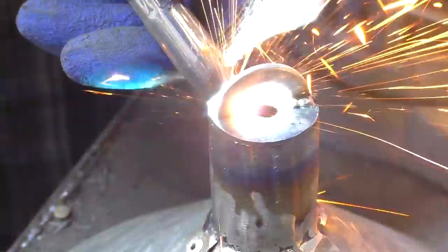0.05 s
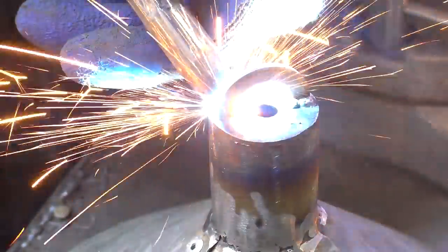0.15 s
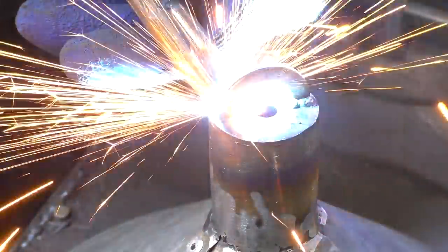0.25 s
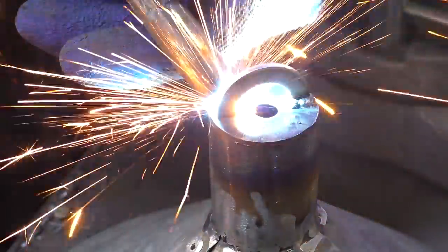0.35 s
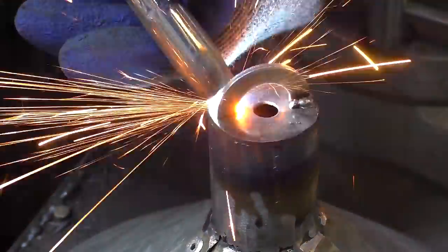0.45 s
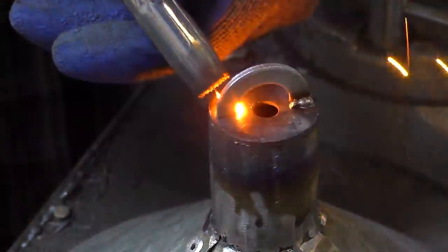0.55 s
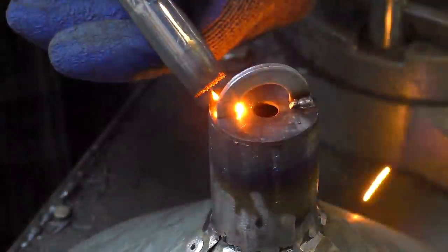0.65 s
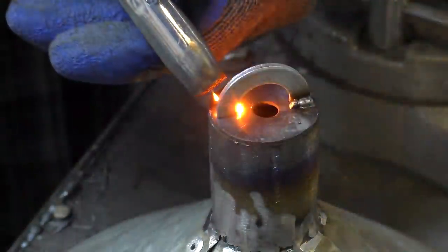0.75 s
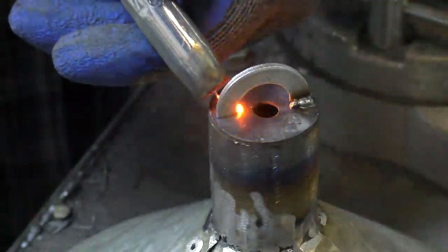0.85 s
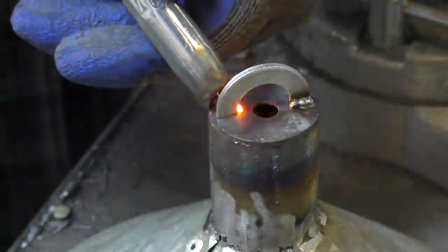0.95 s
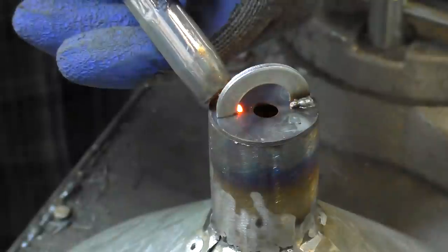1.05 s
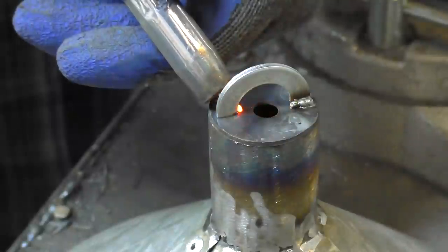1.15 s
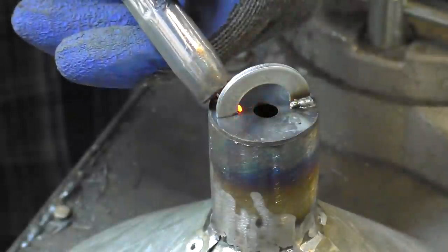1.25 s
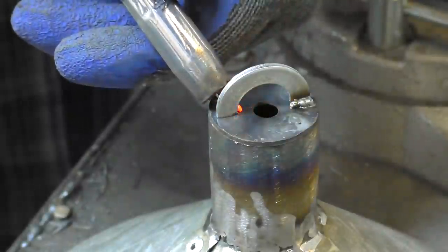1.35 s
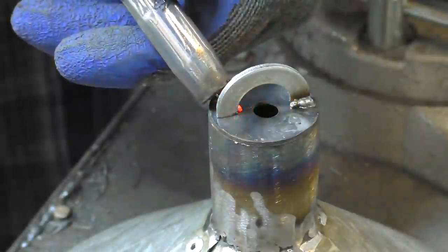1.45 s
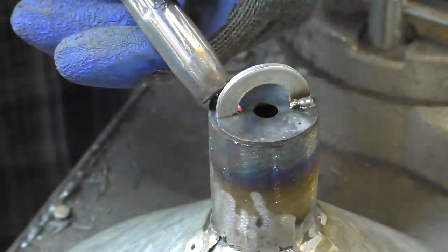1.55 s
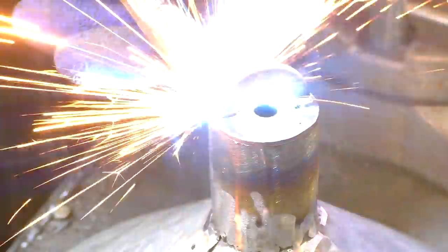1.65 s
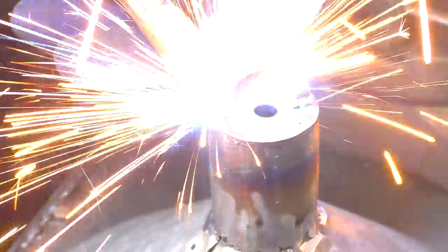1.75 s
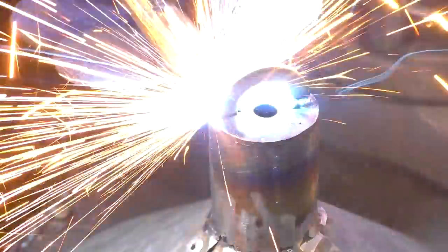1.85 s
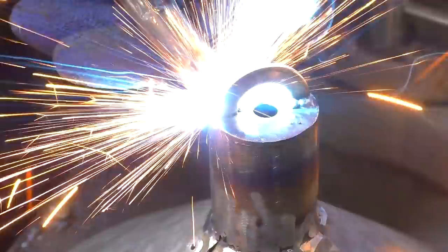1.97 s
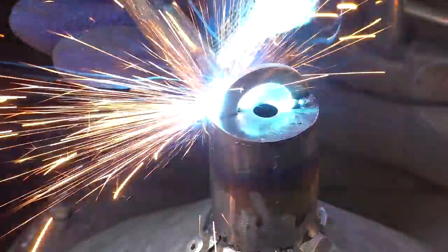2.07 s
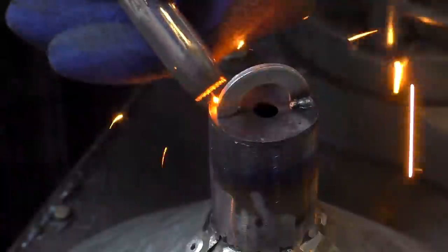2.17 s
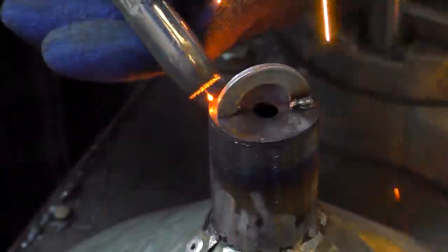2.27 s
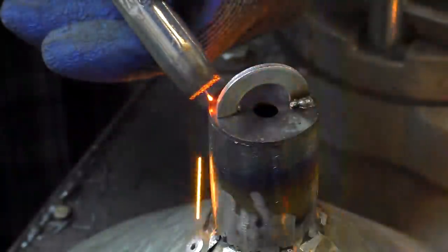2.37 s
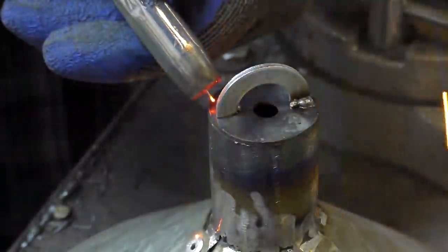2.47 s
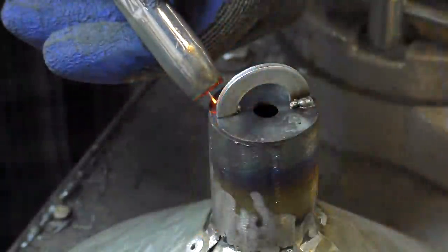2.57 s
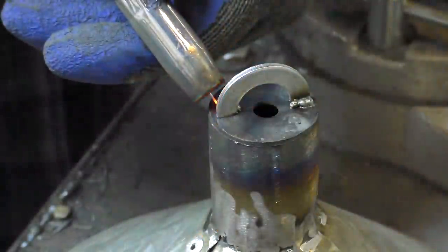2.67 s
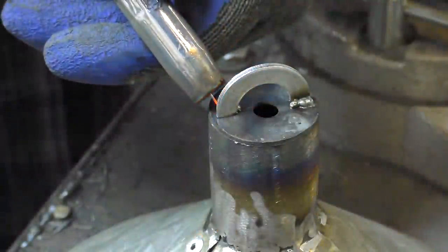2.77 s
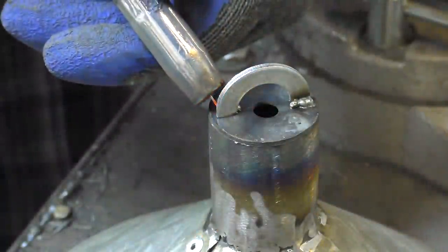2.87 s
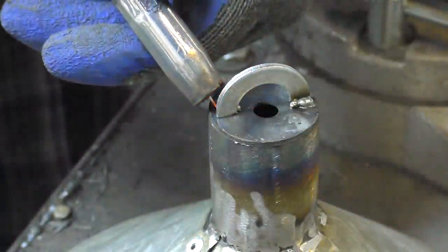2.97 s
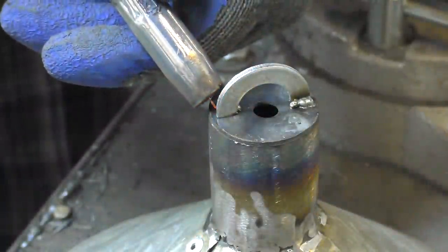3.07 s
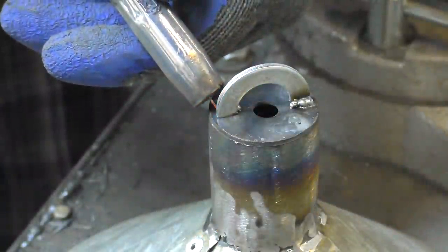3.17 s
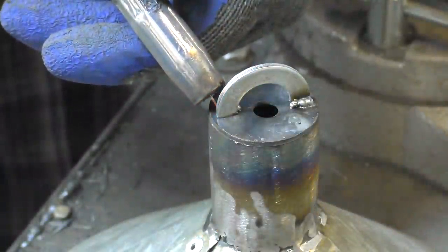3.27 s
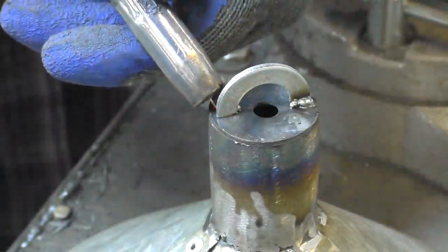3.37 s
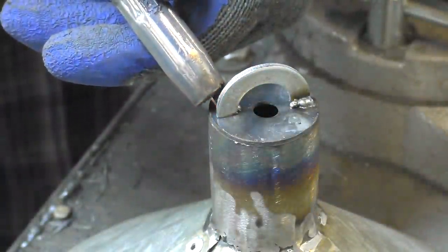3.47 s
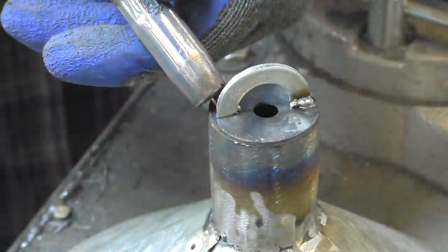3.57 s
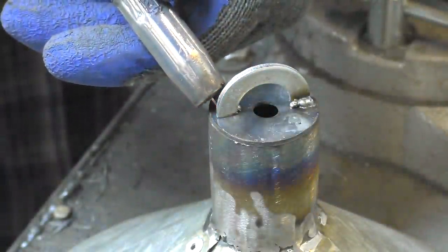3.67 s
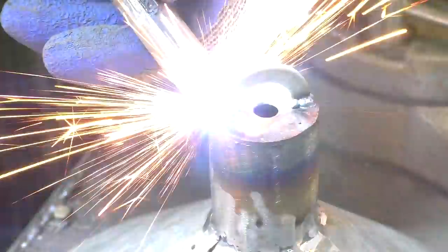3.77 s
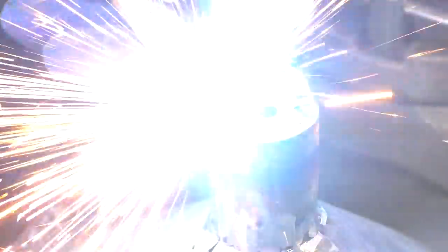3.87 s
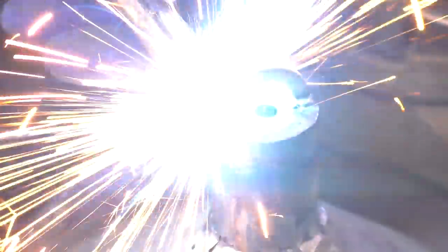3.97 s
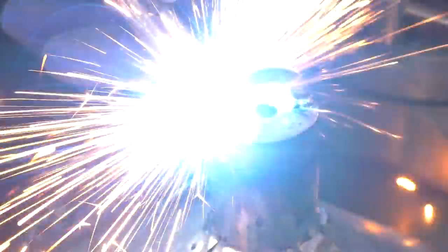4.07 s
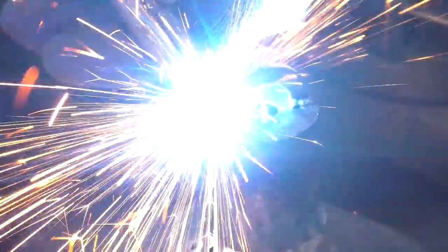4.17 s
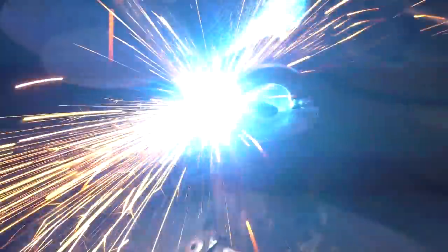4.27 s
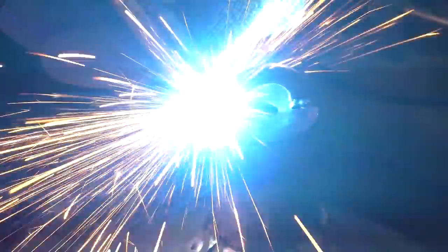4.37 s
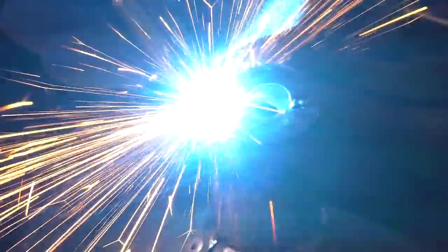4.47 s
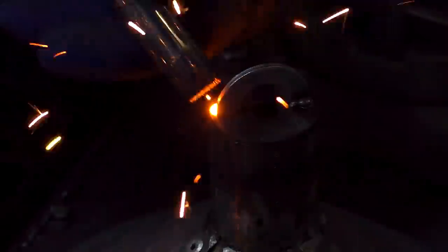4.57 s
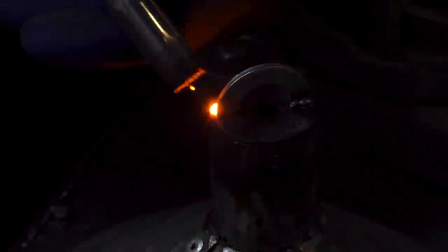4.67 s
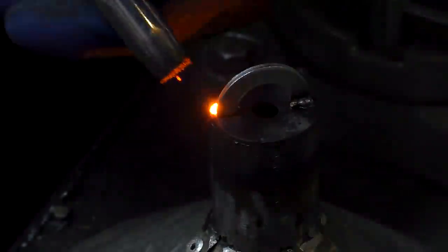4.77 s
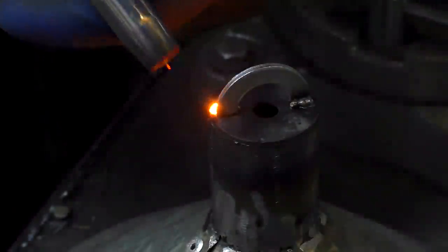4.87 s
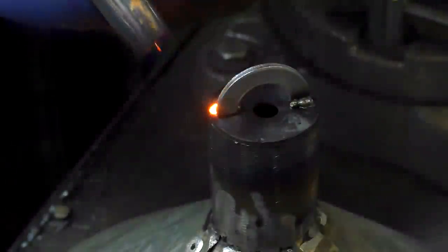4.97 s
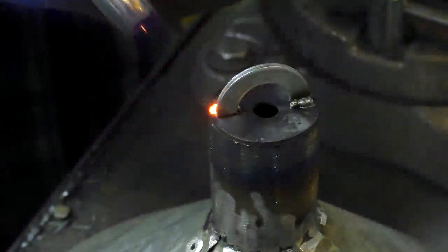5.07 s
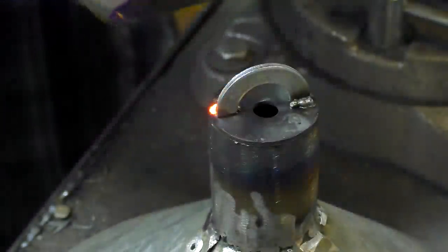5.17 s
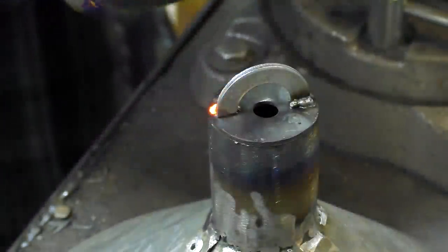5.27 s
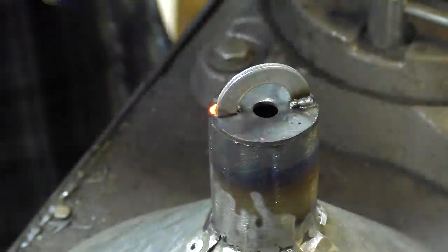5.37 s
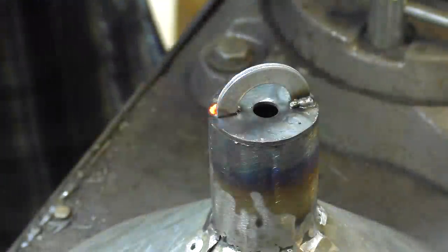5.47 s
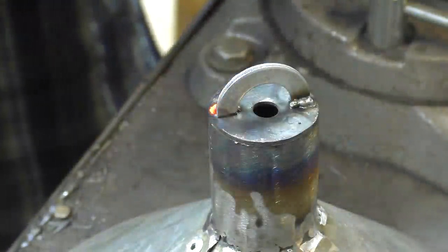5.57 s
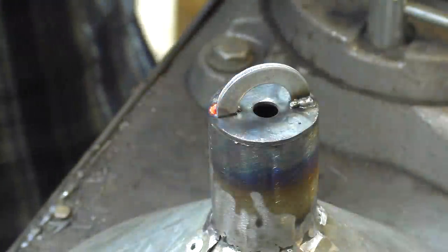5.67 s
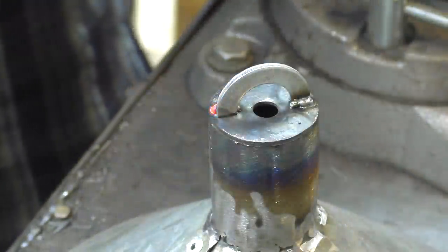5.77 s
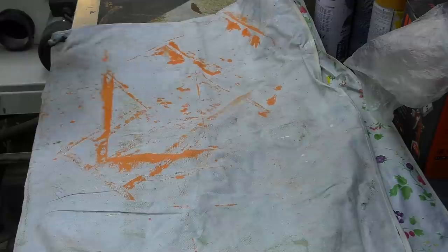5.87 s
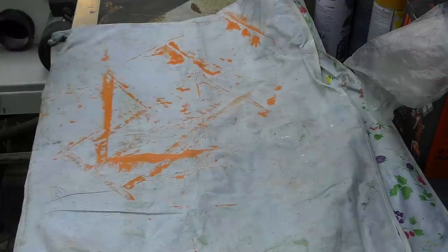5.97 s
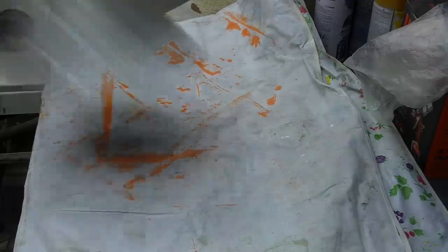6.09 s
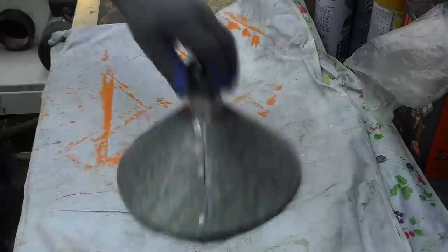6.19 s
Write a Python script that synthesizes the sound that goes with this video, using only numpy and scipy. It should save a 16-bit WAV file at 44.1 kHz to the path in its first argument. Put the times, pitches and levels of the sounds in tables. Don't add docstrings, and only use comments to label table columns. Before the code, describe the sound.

Close stereo in a workshop: an arc weld already crackling stops after half a second, leaving bright gas hiss and a whining fan that swell back as the gain recovers. A second short weld and a longer, rougher third follow, each with hiss afterward. Valve snaps end the later gas flows. A tiny metal tick precedes an abrupt cut to a hushed corner with faint shaken-can swishes.

```python
import sys
import numpy as np
from scipy import signal
from scipy.fft import rfft, irfft, next_fast_len
from scipy.io import wavfile

SR = 44100
rng = np.random.default_rng(int(sys.argv[2]) if len(sys.argv) > 2 else 0)


def amp(db):
    return 10 ** (np.asarray(db, float) / 20)


def write(x):
    x = np.atleast_2d(x).T
    wavfile.write(sys.argv[1], SR, np.round(np.clip(x, -1, 1) * 32767).astype(np.int16))


N = 274743
TIME = np.arange(N) / SR
SIZE = 8192
SCENE_CHANGE_S = 5.908

# pitch_hz, side_minus_mid_db
SIDE_COLOUR = [(60, -2), (150, -17), (380, -13), (950, -10.5), (2380, -7), (5980, -14.5), (15000, -8.5)]

# pitch_hz, density_db
HUSH_COLOUR = [(18, -57), (30, -28), (97, -13), (144, -18), (316, -10), (576, -22), (1200, -3.5),
               (3070, -11), (4790, -19), (11100, -18.5), (15500, -15.5)]
HUSH_DB = -46
# centre_s, half_length_s, level_db
SHAKES = [
    (5.985, 0.015, -40),
    (6.061, 0.02, -38.5),
    (6.104, 0.011, -43),
    (6.156, 0.019, -41),
    (6.225, 0.011, -46),
]
# pitch_hz, density_db
SHAKE_COLOUR = [(180, -52), (300, -20), (631, -15), (1640, -4), (2610, -3), (3340, -6), (3570, -5.5),
                (14800, -13), (15500, -20)]

# pitch_hz, density_db
FAN_RUMBLE = [(35, -62), (60, -29), (147, -26.5), (291, 1), (347, -15), (390, -2), (465, -9.5), (505, -19),
              (542, -11), (589, -27), (754, -45.5), (1000, -16.5), (1300, -39), (2200, -120)]
FAN_AIR = [(350, -67), (600, -16.5), (821, -18.5), (1220, -10), (1410, -9.5), (1560, -6), (1740, -7.5),
           (1880, -15), (1960, -8.5), (2800, -10.5), (5830, -15), (15500, -26.5)]
# multiple_of_blade_hz, level_db
BLADE_ORDERS = [(4, -5), (5, -0.5), (5.25, -11), (6, 2), (7, -8), (9, -14)]
BLADE_HZ, MOTOR_HZ = 309.6, 541.8
RUMBLE_DB, WHINE_DB, HUM_DB = -37.5, -34, -45
HUM_FADES_S, HUM_FADE_DB = 5.2, -4
FIFTH_SWELL_DB, FIFTH_SWELL_S = 5, 0.79

# start_s, end_s, spatter_db, patter_unevenness_ms, gain_hold_s
WELDS = [
    (-.03, 0.524, -37.5, .9, 0.046),
    (1.683, 2.204, -41.5, 0.48, 0.05),
    (3.82, 4.61, -33.5, .4, 0.013),
]

PRESS_DB, PRESS_S, HELD_DB, QUICK_S = -23.5, 0.008, -29.5, 0.11
CREEP_DB, CREEP_S, LAST_DB_PER_S = -10, 0.79, 3.0
SNAP_DB, SNAP_S = -0.5, 0.11

# pitch_hz, density_db
GAS_COLOUR = [(410, -59), (700, -28.5), (1010, -15), (1500, 2.5), (2050, -6), (2400, 2.5), (3230, -2.5),
              (3730, -7), (4840, -0.5), (6350, -8.5), (8120, -3.5), (15500, -17.5)]
# pitch_hz, width_hz, level_db
GAS_RINGS = [(1500, 210, -1.5), (2415, 120, -4), (2680, 63, 0), (3208, 93, -0.5), (4100, 98, -2.5),
             (4420, 90, -1.5), (4730, 130, -3), (5020, 41, 0), (5230, 60, -4), (7310, 45, -2.5),
             (8150, 120, -3), (8540, 57, -5), (9760, 210, -8), (11260, 250, -7.5)]
# valve_shut_s, full_gain_db, sag_db_per_s, middle_db, top_db
FLOWS = [
    (1.358, -12.5, 6.5, 3.5, 0),
    (3.028, -17, 6, 1.5, -1.5),
    (5.43, -23, 2.5, -4.5, -4),
]
TURN_DB_PER_S = [-0.5, 0, 5.5]
HOT_DB, HOT_S = 15, 0.046
# start_s, stop_s, level_db, top_db
PUFFS = [
    (1.648, 1.684, -32.5, 12.5),
    (3.777, 3.798, -24, 4.5),
]
PUFF_RISE_S, SHUT_DB_PER_S = .008, 357

# start_s, rise_s, t60_s, squeak_db, knock_db
VALVE = [
    (3.010, .008, 0.21, -18.5, -22),
    (5.429, .003, 0.21, -20, -45),
]
# pitch_hz, width_hz, level_db
SQUEAK = [(12200, 1500, 2.5), (13600, 870, 1), (10000, 12000, -7), (15000, 1500, -10)]
KNOCK = [(2684, 110, 10), (4300, 600, -8)]

# pitch_hz, width_hz, level_db
TICK = [(2680, 660, 4), (8600, 2500, -5)]
TICK_S, TICK_T60_S, TICK_DB = 5.879, 0.024, -17

# start_s, rise_s, hold_s, level_db, centre_hz
STRIKES = [
    (1.67, 0.004, 0.0069, 3.5, 10000),
    (1.688, 0.0018, 0.0048, -1.5, 9600),
    (1.695, .002, .006, -13, 8040),
    (3.813, 0.0032, 0.0066, 1, 13400),
    (3.818, 0.0024, 0.0057, -3.5, 10000),
    (3.817, 0.0035, 0.0035, -6, 7540),
    (3.828, 0.0024, .004, -11, 9000),
]
# pitch_hz, density_db
SPARK_COLOUR = [(150, -60), (500, -50.5), (1500, -17), (2400, -7.5), (6000, -5), (10300, 6.5), (12000, 2),
                (15600, -5)]
# pitch_hz, density_db
ARC_COLOUR = [(240, -84), (400, -40.5), (1430, -14.5), (1970, -25), (2360, -12), (4930, -9.5), (7340, -6),
              (8550, -11), (10300, 0), (11600, -7), (12900, -2.5), (15500, -7)]
# pitch_hz, width_hz, level_db
ARC_RINGS = [(4240, 270, -11), (1470, 460, -22), (6700, 480, -11), (7420, 100, -2.5), (7630, 120, -6.5),
             (8020, 110, -7), (8960, 100, -6), (9780, 90, -6), (10330, 400, -2), (11400, 100, -9),
             (12900, 300, -5.5), (13700, 110, -12), (14150, 230, -6), (15400, 220, -14)]
# delay_ms, level_db, left_minus_right_db
ECHOES = [(0, 3.5, -.6), (.31, -4, 1), (.40, -6, 0), (.71, -8, -5), (1.25, -7, -2), (1.66, -6, 2),
          (2.30, -9, -5), (3.42, -6, 2)]
BODY_DB = [0.5, -0.5, 3]
BODY_HZ = (860, 5000)
SURGE_DB, SURGE_S = 9, 0.046
# start_s, peak_db, patter_gap_ms, patter_db
POPS_FIRST = [(.0004, 3, 9, 0), (.0093, 3.5, 5.65, 0), (0.0604, -0.5, 15, 4.5), (.09, 5, 23, 0),
              (0.1128, 7, 16, 6), (.1449, 1.5, 6.9, -3.5), (0.2, -0.5, 7.2, -3.5), (0.2437, 0.5, 6.3, -1.5),
              (0.2929, 3.5, 7.3, -4.5), (0.3154, 0, 6, -4), (0.345, 0.5, 6.3, -3.5), (0.3699, 2.5, 19, -7),
              (.408, -0.5, 19.4, -4), (0.4853, 4, 22, -17), (0.5073, -0.5, 23, -10), (0.5315, 1, 20, 0)]
POPS_SECOND = [(1.7101, 2.5, 6.1, 0), (1.7404, -1, 5.15, 0.5), (1.797, 3, 6.3, -2.5), (1.8724, -8, 7, -2),
               (1.9152, -3, 6.5, -3.5), (1.9798, 3.5, 8.35, -1), (2.0457, 0.5, 6.5, -2.5),
               (2.0851, -1, 9, -2), (2.1488, -0.5, 10.1, 3), (2.1888, -0.5, 16, 0), (2.2045, -1.5, 20, 0)]
POPS_THIRD = [(3.8401, -1.5, 14, 0), (3.8532, -1, 18, 0), (3.8717, 2.5, 9, 0), (3.881, 0, 15, 0),
              (3.8951, -3, 4.7, -0.5), (3.9336, 2.5, 5.55, -4), (3.9997, 1, 6.2, -5), (4.0496, -3, 6.1, -4),
              (4.159, 2, 6.5, -2), (4.2109, -1, 5.2, -4), (4.2585, -3, 17, 7), (4.2753, -3.5, 5.4, -4),
              (4.2917, 0, 6, -2), (4.369, 3, 6.4, -3.5), (4.4728, -0.5, 6.6, -2), (4.5988, -6, 10, -7),
              (4.6097, 0, 20, 0)]
SPREAD_DB, LATE_DB_PER_MS = 1.3, 1.5
DOUBLED_FROM_S, DOUBLED_TO_S = .38, .49
LEAD_MS, LEAD_DB = 4.6, -.5


def rms_one(x):
    return x / np.sqrt(np.mean(x ** 2) + 1e-20)


def at_hz(points, hz):
    point_hz, point_db = np.transpose(points)
    return np.interp(np.log(hz + 1), np.log(point_hz), point_db)


def power_of(colour, hz, trim_db=0.):
    return amp(at_hz(colour, hz) + trim_db) ** 2


def rings(peaks, hz):
    return sum(amp(db) ** 2 / (1 + (2 * (hz - centre) / width) ** 2) ** 2 for centre, width, db in peaks)


def drift(rate):
    r = np.exp(-80 * np.pi * rate / SR)
    slow = signal.lfilter([1], [1, -2 * r, r * r], rng.standard_normal(N // 40 + 2002))[2000:]
    return np.interp(np.arange(N) / 40, np.arange(len(slow)), rms_one(slow))


def stereo_noise(power_at, side_db=0., ripple_db=5.5, ripple_hz=35.2):
    size = next_fast_len(N)
    hz = np.fft.rfftfreq(size, 1 / SR)
    depth_db = ripple_db * np.minimum(hz / 1500, 1)
    ripple = [amp(depth_db * np.interp(hz / ripple_hz, np.arange(1000), draw))
              for draw in rng.standard_normal((2, 1000))]
    mid, side = rfft(rng.standard_normal((2, size))) * np.sqrt(power_at(hz)) * ripple
    side = side * amp(at_hz(SIDE_COLOUR, hz) + side_db)
    return rms_one(irfft([mid + side, mid - side], size)[:, :N])


def tone(hz, turns, wobble_db):
    lag = rng.normal(0, 0.27) * np.array([[1], [-1]])
    return np.sqrt(2) * amp(wobble_db * drift(4.8)) * np.sin(2 * np.pi * hz * turns + lag)


def minimum_phase(power):
    cepstrum = irfft(np.log(power + 1e-12) / 2)
    cepstrum[1:SIZE // 2] *= 2
    cepstrum[SIZE // 2 + 1:] = 0
    return np.exp(rfft(cepstrum))


def corner():
    swish = sum(amp(db) * np.exp(-((TIME - s) / half) ** 2) for s, half, db in SHAKES)
    hush = stereo_noise(lambda hz: power_of(HUSH_COLOUR, hz), side_db=1.0)
    return amp(HUSH_DB) * hush + swish * stereo_noise(lambda hz: power_of(SHAKE_COLOUR, hz), side_db=2.5)


def fan(air_db=5.5, drift_share=0.00053):
    rumble = stereo_noise(lambda hz: power_of(FAN_RUMBLE, hz), side_db=1.5)
    air = stereo_noise(lambda hz: power_of(FAN_AIR, hz), side_db=3.0, ripple_db=2.5)
    turns = np.cumsum(1 + drift_share * drift(2.3)) / SR
    swell_db = FIFTH_SWELL_DB * np.clip((TIME - HUM_FADES_S) / FIFTH_SWELL_S, 0, 1)
    blades = 0
    for order, db in BLADE_ORDERS:
        level = amp(db + (order == 5) * swell_db)
        blades = blades + level * tone(order * BLADE_HZ, turns, wobble_db=-0.5)
    hum = tone(MOTOR_HZ, turns, wobble_db=1.5) + amp(-4.5) * tone(2 * MOTOR_HZ, turns, wobble_db=3.5)
    hum_db = HUM_DB + HUM_FADE_DB * np.clip((TIME - HUM_FADES_S) / 0.071, 0, 1)
    return amp(RUMBLE_DB) * rumble + amp(WHINE_DB) * (blades + amp(air_db) * air) + amp(hum_db) * hum


def gain_db():
    out = np.zeros(N)
    for start, end, _, _, hold in WELDS:
        s = np.cumsum([start, PRESS_S, end - start - PRESS_S, PRESS_S, hold, QUICK_S, CREEP_S, 1])
        before = out[max(int(start * SR), 0)]
        db = [before, PRESS_DB, PRESS_DB, HELD_DB, HELD_DB, CREEP_DB, 0, LAST_DB_PER_S]
        out = np.where(TIME > start, np.interp(TIME, s, db), out)
    return out + sum(SNAP_DB * (TIME > s) * np.exp(-np.abs(TIME - s) / SNAP_S) for s, *_ in VALVE)


def gas(gain, low_hz=3560.0, high_hz=6700.0, rings_db=1.5, flutter_db=-0.18):
    def power(hz):
        return power_of(GAS_COLOUR, hz, -5) + amp(rings_db) ** 2 * rings(GAS_RINGS, hz)

    def under(hz, edge_hz):
        return 1 / (1 + (hz / edge_hz) ** 12)

    low = stereo_noise(lambda hz: power(hz) * under(hz, low_hz), ripple_db=1.5)
    middle = stereo_noise(lambda hz: power(hz) * (under(hz, high_hz) - under(hz, low_hz)), ripple_db=1.5)
    top = stereo_noise(lambda hz: power(hz) * (1 - under(hz, high_hz)), ripple_db=2.0)
    out = 0
    for (_, start, *_), (stop, db, sag, middle_db, top_db), turn in zip(WELDS, FLOWS, TURN_DB_PER_S):
        since = np.maximum(TIME - start, 0)
        level = (since > 0) * gain * amp(db - sag * since - SHUT_DB_PER_S * np.maximum(TIME - stop, 0))
        aimed = amp(middle_db - 3.5 + turn * np.minimum(since, 1)) * middle
        heated = amp(top_db + HOT_DB * np.exp(-(since / HOT_S) ** 2 / 2)) * top
        out = out + level * (low + aimed + heated)
    for start, stop, db, top_db in PUFFS:
        rise = np.clip((TIME - start) / PUFF_RISE_S, 0, 1)
        level = rise * amp(db - SHUT_DB_PER_S * np.maximum(TIME - stop, 0))
        out = out + level * (low + amp(-3.0) * middle + amp(top_db) * top)
    return out * amp(flutter_db * drift(25))


def valve():
    squeak = stereo_noise(lambda hz: rings(SQUEAK, hz))
    knock = stereo_noise(lambda hz: rings(KNOCK, hz))
    out = 0
    for s, rise, t60, squeak_db, knock_db in VALVE:
        shape = np.clip((TIME - s) / rise, 0, 1) * amp(-60 * np.maximum(TIME - s - rise, 0) / t60)
        out = out + shape * (amp(squeak_db) * squeak + amp(knock_db) * knock)
    return out


def tick():
    shape = (TIME > TICK_S) * amp(TICK_DB - 60 * np.abs(TIME - TICK_S) / TICK_T60_S)
    return shape * stereo_noise(lambda hz: rings(TICK, hz))


def strikes():
    out = 0
    for start, rise, hold, db, centre_hz in STRIKES:
        fall = amp(-60 * np.maximum(TIME - start - rise - hold, 0) / 0.023)
        shape = np.clip((TIME - start) / rise, 0, 1) * fall
        burst = stereo_noise(lambda hz: power_of(ARC_COLOUR, hz, 5.5) + rings([(centre_hz, 4000, 0)], hz))
        out = out + amp(db) * shape * burst
    return out


def short_circuits():
    pops = []
    for rows, (*_, uneven_ms, _) in zip((POPS_FIRST, POPS_SECOND, POPS_THIRD), WELDS):
        for (s, db, gap_ms, patter_db), (following, *_) in zip(rows, rows[1:] + rows[-1:]):
            late_ms, luck_db = rng.standard_normal((2, 30)) * [[uneven_ms], [SPREAD_DB]]
            steps = np.linspace(s, following, round(1000 * (following - s) / gap_ms) + 1)[1:-1]
            pops.append((s, db))
            for k, t in enumerate(steps):
                wait_db = LATE_DB_PER_MS * (late_ms[k + 1] - late_ms[k])
                pops.append((t + late_ms[k + 1] / 1000, patter_db + luck_db[k] + wait_db))
    pops += [(s - LEAD_MS / 1000, LEAD_DB) for s, _ in pops if DOUBLED_FROM_S < s < DOUBLED_TO_S]
    return np.transpose(pops)


def spark_paths(bench_db=-13.0, bench_t60=0.063):
    hz = np.fft.rfftfreq(SIZE, 1 / SR)
    pulse = minimum_phase(power_of(SPARK_COLOUR, hz))
    echoes = 0
    for ms, db, pan_db in ECHOES:
        sides = amp(db + pan_db * np.array([[.5], [-.5]]))
        echoes = echoes + sides * np.exp(-2j * np.pi * hz * ms / 1000)
    t = np.arange(SIZE) / SR
    fade = np.minimum(t / 0.00022, 1) * amp(bench_db - 60 * t / bench_t60)
    shared, left, right = rng.standard_normal((3, SIZE)) * fade
    colour = minimum_phase(power_of(ARC_COLOUR, hz) + rings(ARC_RINGS, hz))
    faint = rfft(shared + 0.5 * np.array([left, right])) * colour
    return irfft(pulse * echoes + faint)[:, :SIZE // 2] / irfft(pulse).max()


def scatter(sparks, rings_db=20.5, near_db=-11.5, near_t60=0.029, room_db=-32.0, room_t60=0.84):
    t = np.arange(SIZE * 3) / SR

    def envelope(db, t60):
        decay = np.minimum(t / 0.0004, 1) * amp(db - 60 * t / t60) ** 2
        return np.sqrt(np.abs(signal.fftconvolve(sparks ** 2, decay)[:N]))

    def ringing_power(hz):
        return power_of(ARC_COLOUR, hz, -3.5) + amp(rings_db) ** 2 * rings(ARC_RINGS, hz)

    ringing = stereo_noise(ringing_power, side_db=1.5, ripple_db=-4.0)
    tail = stereo_noise(lambda hz: power_of(ARC_COLOUR, hz), side_db=0.5, ripple_db=4.5)
    return envelope(near_db, near_t60) * ringing + envelope(room_db, room_t60) * tail


def arc():
    s, level_db = short_circuits()
    sparks = np.zeros(N)
    sparks[(s * SR).astype(int)] = -amp(1.35 * np.minimum(level_db, 5))
    spatter = amp(2.5 * np.minimum(rng.exponential(1, N), 3)) * (rng.random(N) < 1500 / SR)
    level = 0
    for start, end, db, *_ in WELDS:
        surge_db = SURGE_DB * np.exp(-np.abs(TIME - start) / SURGE_S)
        level = level + ((TIME > start) & (TIME < end)) * amp(db + surge_db)
    sparks -= rms_one(spatter) * level
    out = signal.fftconvolve(spark_paths(), [sparks], axes=1)[:, :N] + scatter(sparks)
    body = signal.sosfilt(signal.butter(2, BODY_HZ, "band", fs=SR, output="sos"), out)
    body_gain = amp(np.interp(TIME, [end for _, end, *_ in WELDS], BODY_DB))
    return out + (body_gain - 1) * body + strikes()


def scene():
    welding = np.clip((SCENE_CHANGE_S - TIME) / 0.006, 0, 1)
    gain = amp(gain_db())
    bench = gain * fan() + gas(gain) + valve() + tick() + arc()
    balance = amp(np.array([[-.35], [.35]]))
    return welding * bench * balance + (1 - welding) * corner()


def top_cut(x):
    return signal.sosfilt(signal.butter(12, 15740, fs=SR, output="sos"), x)


def record(dry):
    steep = signal.ellip(10, .2, 45, 15760, fs=SR, output="sos")
    cut = signal.sosfiltfilt(steep, dry)
    return top_cut(np.clip(cut, -1, 1))


dry = scene()
out = record(dry)
write(out)
```